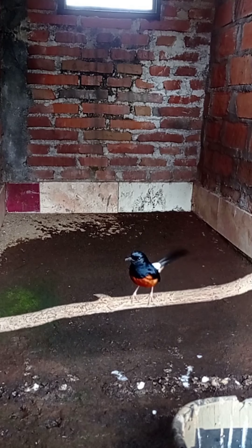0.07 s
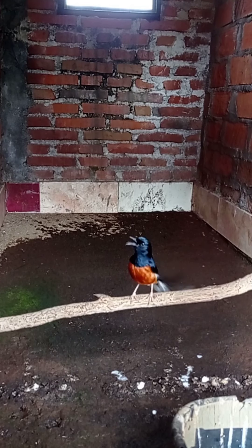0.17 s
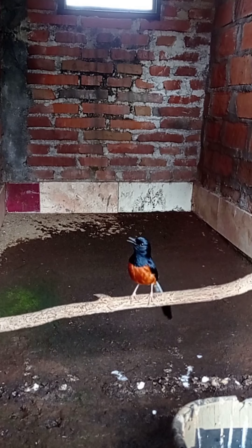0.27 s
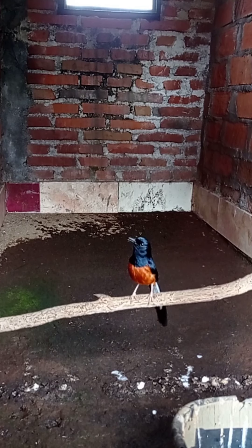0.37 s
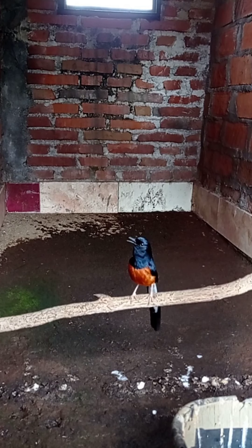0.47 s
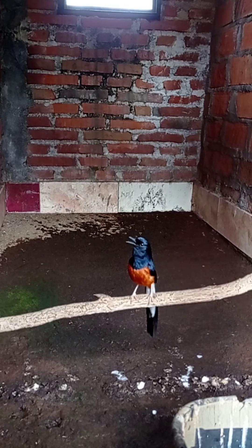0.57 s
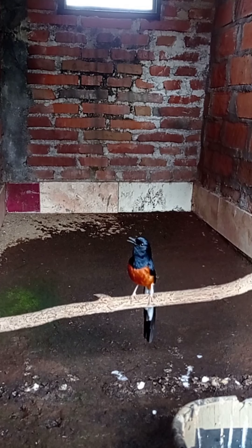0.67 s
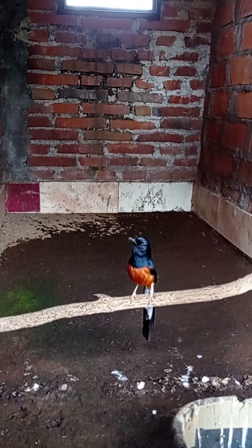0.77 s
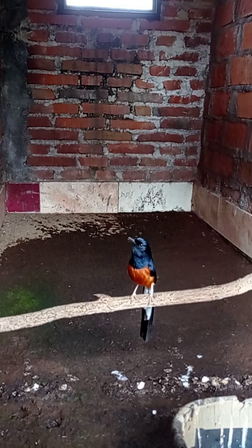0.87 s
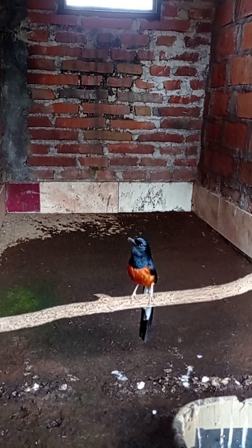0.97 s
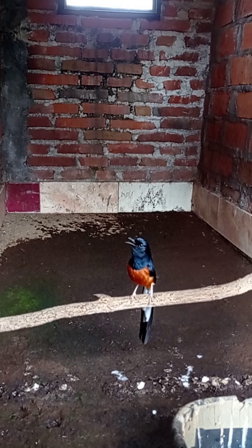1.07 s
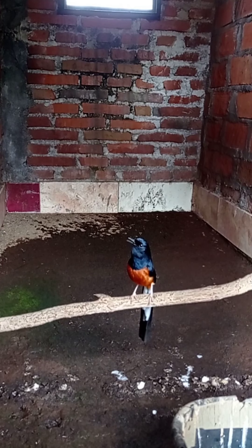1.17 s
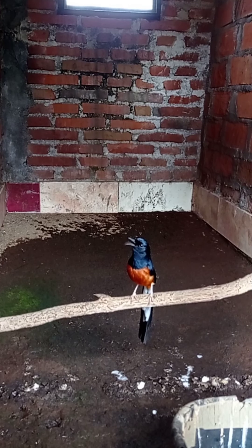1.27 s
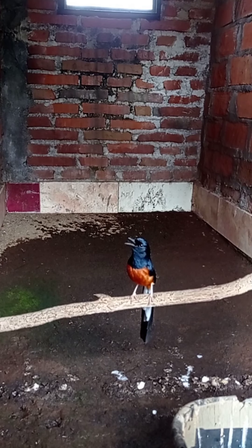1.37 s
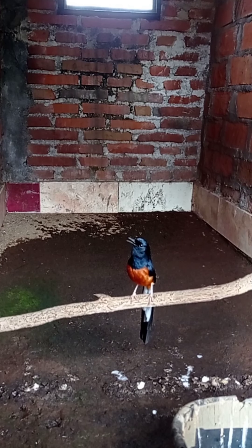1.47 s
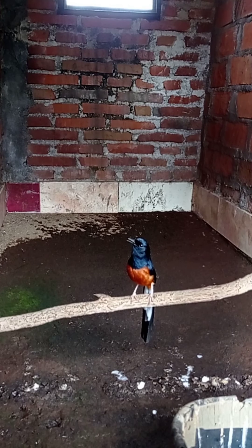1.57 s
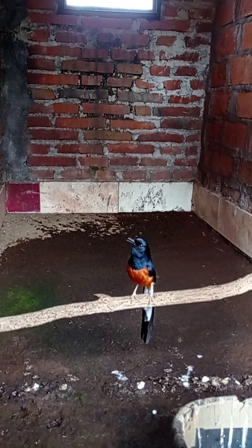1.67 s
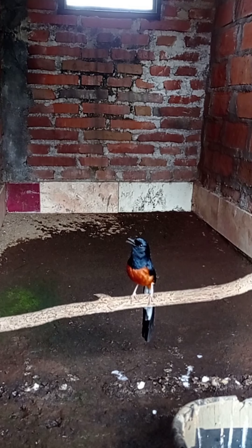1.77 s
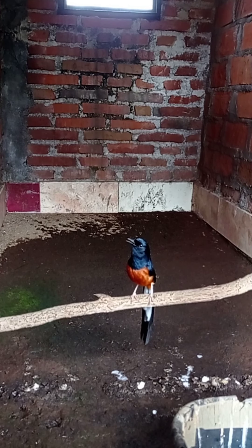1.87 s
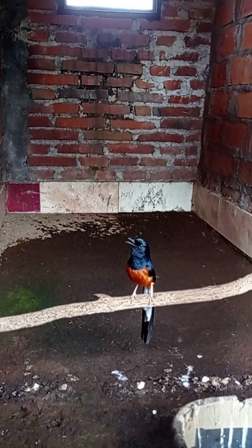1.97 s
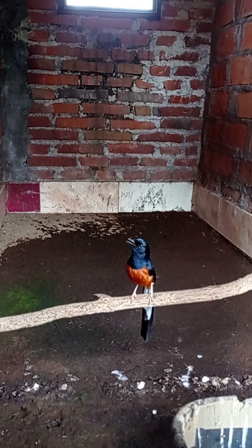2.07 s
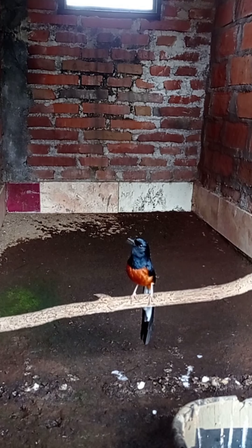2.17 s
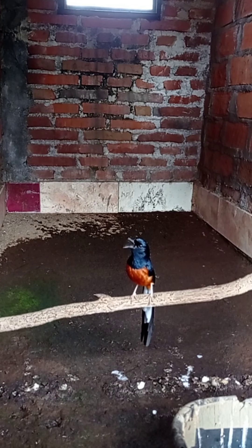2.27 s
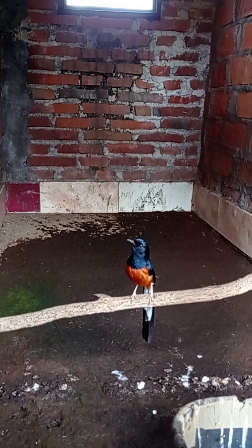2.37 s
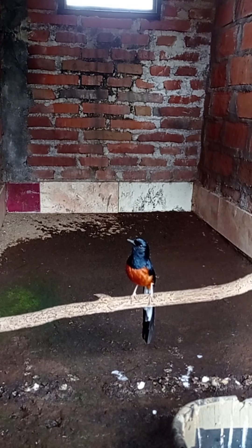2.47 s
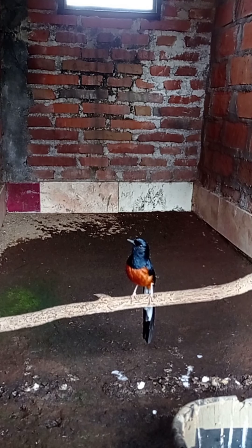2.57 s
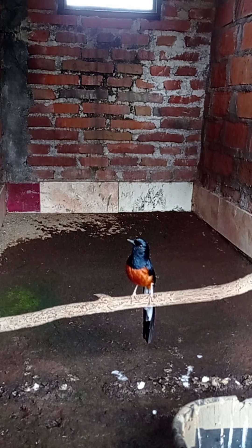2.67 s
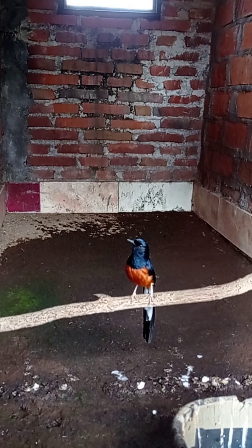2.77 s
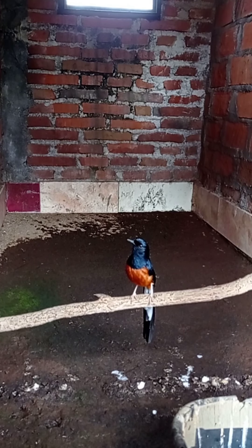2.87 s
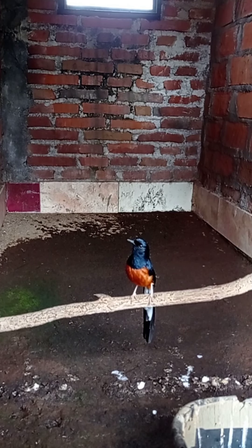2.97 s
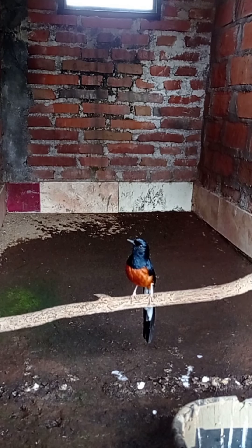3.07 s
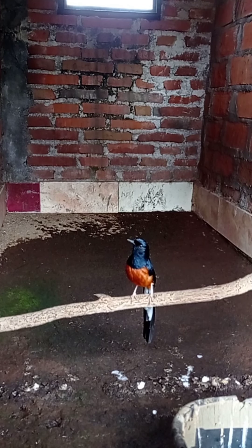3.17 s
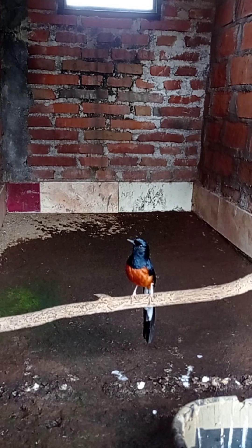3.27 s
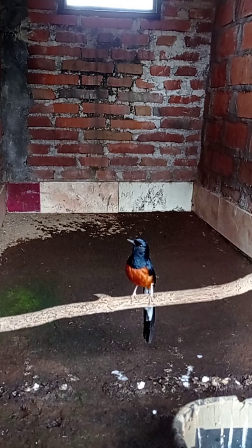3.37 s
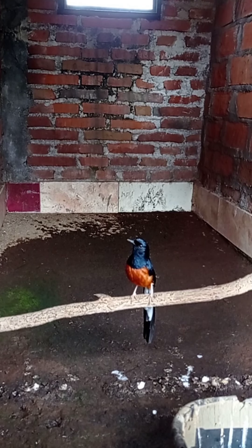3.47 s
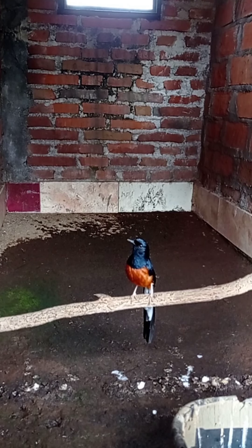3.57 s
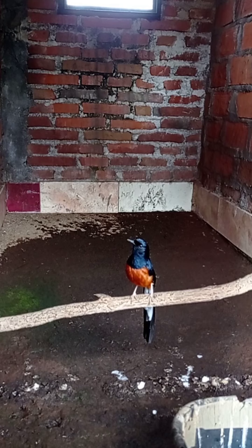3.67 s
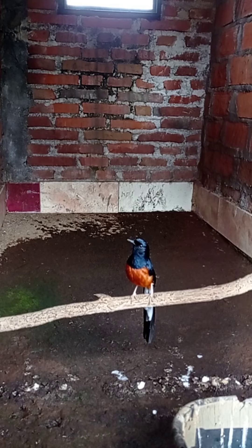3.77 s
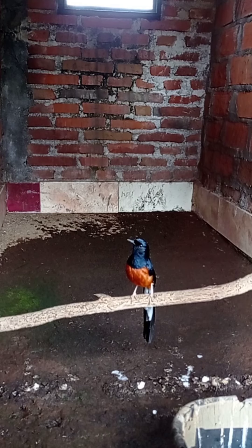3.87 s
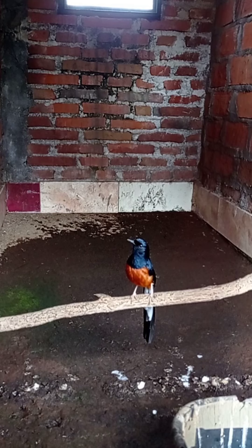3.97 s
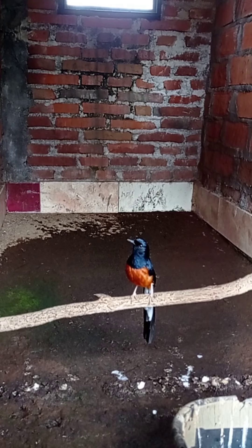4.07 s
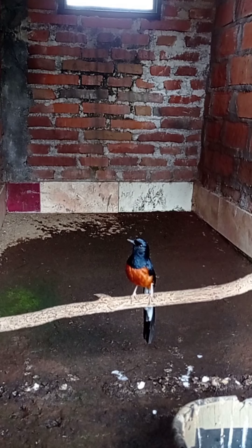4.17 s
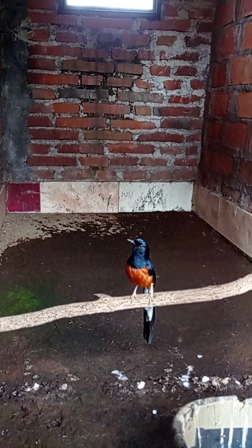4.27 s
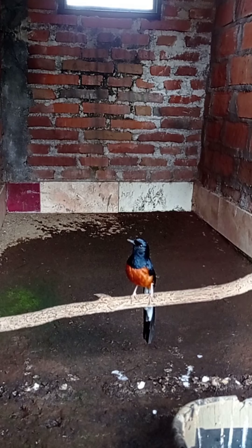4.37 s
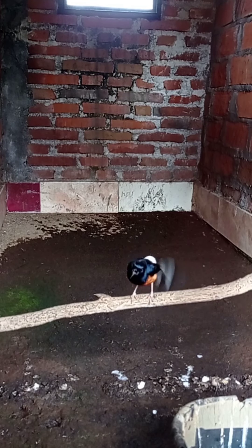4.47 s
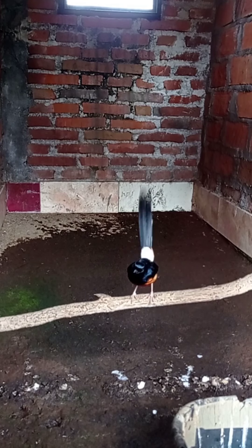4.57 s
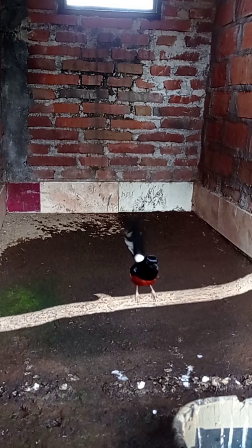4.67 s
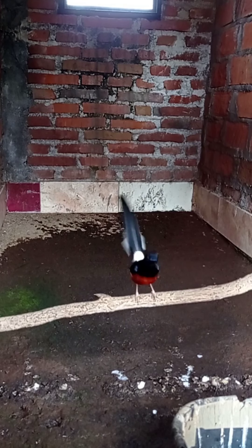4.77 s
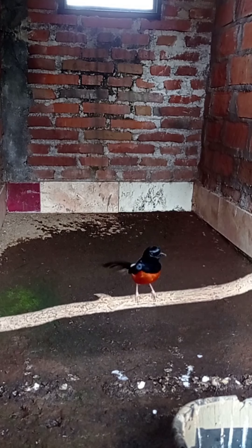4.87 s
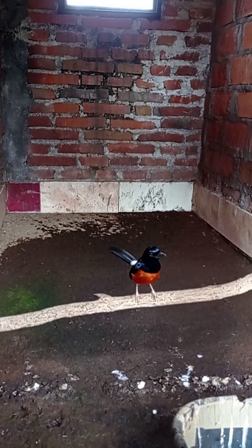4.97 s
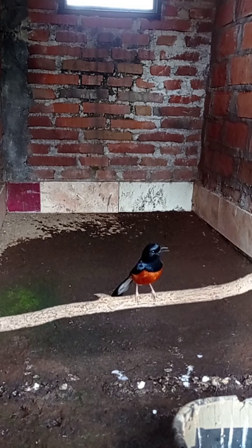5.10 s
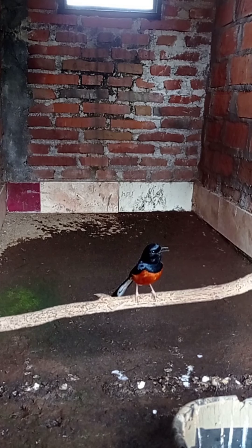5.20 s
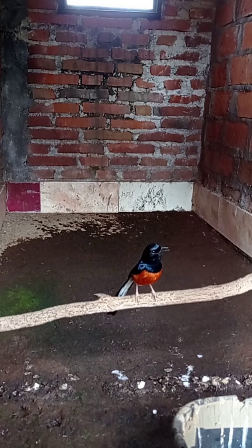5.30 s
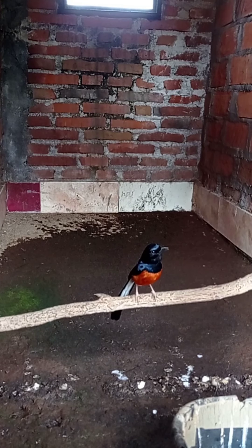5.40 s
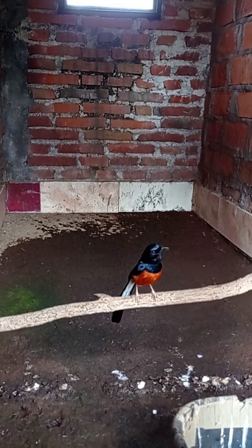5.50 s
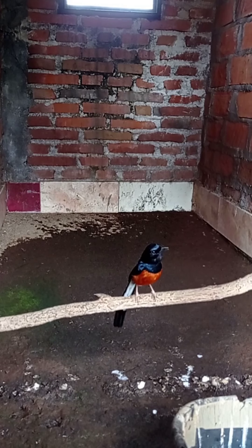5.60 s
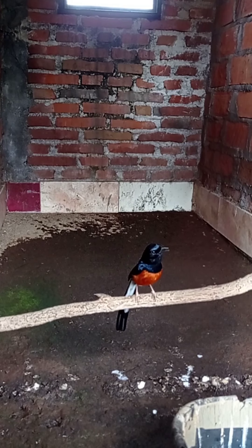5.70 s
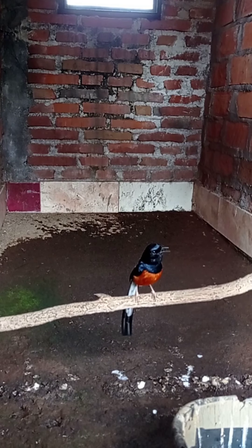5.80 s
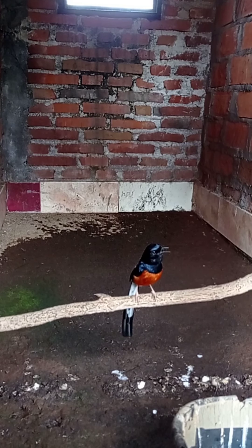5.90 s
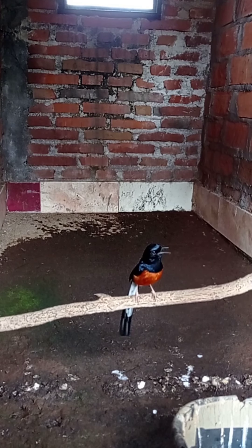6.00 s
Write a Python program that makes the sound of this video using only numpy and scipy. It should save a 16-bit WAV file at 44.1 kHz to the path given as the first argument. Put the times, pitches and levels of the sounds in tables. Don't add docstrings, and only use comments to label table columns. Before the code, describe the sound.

Bright, fluid birdsong rings off close brick walls, pausing for soft murmurs and sharp tail snaps before a long whistle and a pulsed burst.

```python
import sys
import numpy as np
from scipy import signal
from scipy.fft import irfft, next_fast_len
from scipy.io import wavfile
from scipy.ndimage import uniform_filter1d, minimum_filter1d

SR = 44100
rng = np.random.default_rng(int(sys.argv[2]) if len(sys.argv) > 2 else 0)


def master_out(mix):
    frames = np.transpose(np.atleast_2d(mix))
    ceiling = np.clip(frames, -1, 1)
    pcm = np.round(ceiling * 32767).astype(np.int16)
    wavfile.write(sys.argv[1], SR, pcm)


def invert_db(level):
    return 10 ** (np.asarray(level, dtype=float) / 20)


N = 266364

# (start [s], length [s], level [dB])
RUSTLES = [
    (-.05, 0.13, -45),
    (0.097, 0.56, -43.5),
    (2.395, 0.59, -50),
    (2.655, 0.23, -54),
    (4.266, 0.76, -59.5),
    (4.734, 0.64, -59.5),
    (4.928, 0.56, -54),
]
# (frequency [Hz], level [dB])
RUSTLE_COLOUR = [(1350, -32.5), (2300, -9), (2800, -15.5), (3900, -3.5), (5000, -12), (6300, -10.5),
                 (8200, -24), (11500, -38.5)]
# (time [s], level [dB], width [s])
PUFFS = [
    (3.728, -63, 0.046),
    (4.0, -65.5, 0.044),
    (4.209, -64.5, 0.052),
    (4.42, -64.5, 0.03),
    (5.671, -59.5, 0.03),
]
# (frequency [Hz], level [dB])
PUFF_COLOUR = [(150, -15), (300, -2.5), (1100, -16.5), (2000, -19), (8000, -60)]

# (time [s], level [dB])
HUM = [(0, -52), (0.45, -54), (0.58, -63), (0.72, -77.5), (0.9, -61.5), (1.2, -70), (1.5, -81), (1.75, -72),
       (1.95, -77), (2.2, -75), (2.5, -75.5), (2.68, -66), (3.17, -76), (3.8, -66), (4.25, -63.5),
       (5.1, -61), (5.79, -63.5), (6.04, -81)]
# (time [s], level [dB], width [s])
GUSTS = [(.28, -64, 0.42), (2.3, -78.5, 0.29), (2.74, -56.5, 0.035), (3.02, -65, 0.057), (3.33, -69, 0.12),
         (3.78, -59.5, 0.16), (4.45, -62.5, 0.19), (4.92, -54.5, 0.05), (5.15, -64, 0.19),
         (5.57, -61, 0.14), (5.75, -57.5, 0.085)]
# (frequency [Hz], level [dB])
DEEP_COLOUR = [(20, -46), (45, -27.5), (80, 16), (110, -9), (160, -39), (400, -81.5)]
# (frequency [Hz], level [dB])
UPPER_COLOUR = [(80, -41.5), (115, -12), (150, 1.5), (220, -11), (330, -25), (600, -35), (4000, -39.5),
                (11000, -81)]
# (frequency [Hz], level [dB])
AIR_COLOUR = [(180, -29.5), (300, -8), (1000, -17.5), (2500, -13.5), (4500, -13), (8000, -35),
              (12000, -55.5)]
# (time [s], level [dB], frequency [Hz], width [s])
PHONE_KNOCKS = [
    (5.799, -36.5, 140.4, 0.0069),
]

PURE_DB = [2, 2, 4, 3.5, -5.5, -14.5]
HARSH_DB = [-7, -10, -20.5, -28.5, -41, -33.5]
VOICES = {"scoop": (-34.5, -41), "whip": (-35.5, -42), "settle": (-52, -59), "climb": (-44, -49),
          "dart": (-19.5, -38), "hook": (-37.5, -45.5), "shelf": (-31.5, -37), "leap": (-47, -52.5),
          "swell": (-41, -62.5), "hold": (-41, -50.5), "pipe": (-28.5, -46), "reed": (-19, -39.5),
          "pip": (-34.5, -49.5), "chirp": (-32, -59.5), "call": (-40.5, -53), "squeeze": (16.5, 23.4),
          "arch": (-39.5, -50.5), "sweep": (-15.5, -38), "whistle": (-38.5, -54)}
WOBBLES = {"arch": .011, "reed": .008, "settle": .008, "hook": .008, "swell": .003, "hold": .005, "dart":
           .003, "scoop": .005, "whip": .005, "pipe": .0015, "whistle": .0015, "pip": .003, "climb": .006,
           "leap": .006, "chirp": .008, "call": .006}
# (frequency [Hz], level [dB])
PARTIAL_COLOUR = [(2500, -12), (6500, 7.5), (8000, -4.5), (9700, 14.5), (12500, -10), (14800, 2)]
SHAPES = {"whip": (2.5, 0.91, .75, -15, -17), "settle": (1.4, 5.5, 5.5, -24.5, -8.5),
          "climb": (1.71, 2.5, 3, -18, -20), "hook": (1.07, 3, 0, -26, -11.5), "shelf": (12, 0, 4, -24, -2),
          "leap": (0.77, 1.25, 0.9, -8.5, -16.5), "swell": (2, 2.5, 0.5, -29, -36.5),
          "hold": (3.5, 7.5, -0.63, -34.5, -3), "chirp": (0.84, 1.55, .5, -19, -27),
          "call": (1.93, 8.5, .5, -10, -13)}

# (start [s], length [s], from [Hz], to [Hz], peak [dB])
HOOKS = [
    (0, 0.042, 2044, 1274, -27.5),
    (0, 0.0095, 3120, 2080, -18.5),
    (1.548, 0.058, 1967, 1630, -17.5),
]
# (time [s], pitch [Hz], level [dB])
SQUEEZE = [(0.222, 1143, -67), (0.243, 1377, -46), (0.266, 1534, -38), (0.284, 1703, -43),
           (0.296, 1860, -47.5), (0.319, 1723, -63)]
# (time [s], pitch [Hz], level [dB])
SMALL_ARCH = [(0.3, 1750, -45.5), (0.34, 1916, -28.5), (0.38, 2183, -26), (0.407, 2083, -26),
              (0.432, 1891, -34), (0.468, 1620, -50), (0.501, 1483, -53)]
# (time [s], pitch [Hz], level [dB])
BIG_ARCH = [(0.509, 1440, -47), (0.542, 1630, -30), (0.57, 1927, -22.5), (0.601, 2126, -9.5),
            (0.652, 2211, -10.5), (0.679, 2217, -14.5), (0.71, 2073, -10.5), (0.742, 1814, -30.5),
            (0.8, 1788, -37)]
# (start [s], length [s], from [Hz], to [Hz], peak [dB])
SETTLES = [
    (.822, 0.15, 1224, 2110, -27),
]
# (time [s], pitch [Hz], level [dB])
REED = [(.882, 1015, -62.5), (.897, 1187, -42), (.908, 1188, -32.5), (.936, 1242, -31), (.948, 1255, -36.5),
        (.964, 1292, -26.5), (.984, 1260, -29.5), (.998, 1120, -38.5)]
# (time [s], pitch [Hz], level [dB])
SCOOP = [(1.059, 1225, -44), (1.075, 1340, -25), (1.095, 1424, -17), (1.12, 1667, -16), (1.139, 1833, -15),
         (1.153, 2177, -16), (1.164, 2250, -23)]
# (start [s], length [s], from [Hz], to [Hz], peak [dB])
WHIPS = [
    (1.222, 0.092, 1462, 2785, -15.5),
]
# (start [s], peak [dB])
DARTS = [
    (1.372, -14),
    (1.45, -16),
]
# (time after start [s], pitch [Hz], level under peak [dB])
DART = [(0, 5550, -42), (.008, 4950, -28), (.013, 4250, -19), (.017, 3600, -7), (.02, 3150, 0),
        (.0235, 2720, -2), (.027, 2350, -14), (.031, 1950, -36)]
# (start [s], length [s], from [Hz], to [Hz], peak [dB])
SHELVES = [
    (1.53, 0.014, 1690, 2050, -41),
]
# (time [s], pitch [Hz], level [dB])
STEPS = [
    [(1.704, 2480, -54.5), (1.712, 2500, -32.5), (1.72, 2374, -34), (1.725, 1890, -21.5),
     (1.738, 1730, -18.5), (1.76, 1630, -16.5), (1.782, 1396, -37.5)],
    [(1.866, 2960, -42.5), (1.876, 3070, -25.5), (1.882, 2910, -28), (1.886, 2470, -24.5),
     (1.895, 2125, -16), (1.91, 1766, -18), (1.93, 1756, -17.5), (1.955, 1500, -39.5)],
    [(2.014, 3385, -40), (2.024, 3500, -30.5), (2.03, 3250, -25.5), (2.035, 2724, -9.5), (2.045, 2370, -21),
     (2.06, 2166, -15), (2.08, 2013, -23.5), (2.097, 1795, -29)],
]
# (start [s], length [s], from [Hz], to [Hz], peak [dB])
SWELLS = [
    (1.82, 0.05, 2840, 2830, -36),
]
# (start [s], length [s], from [Hz], to [Hz], peak [dB])
HOLDS = [
    (2.15, 0.085, 2383, 2440, -37.5),
    (2.33, 0.15, 1812, 1787, -42.5),
]
# (time [s], pitch [Hz], level [dB])
PLUNGE = [(2.184, 3940, -32.5), (2.19, 5060, -43.5), (2.199, 5110, -21.5), (2.206, 4486, -14.5),
          (2.215, 3260, -19), (2.221, 2664, -23), (2.232, 2082, -31), (2.25, 1450, -34),
          (2.265, 1036, -53.5)]
# (time [s], pitch [Hz], level [dB])
SOAR = [(2.283, 1980, -20), (2.289, 2560, -19), (2.294, 2910, -16.5), (2.299, 3730, -24),
        (2.311, 4100, -33.5), (2.322, 4140, -21), (2.334, 4950, -21), (2.351, 5320, -25.5),
        (2.367, 5390, -45)]
# (time [s], pitch [Hz], level [dB])
COO = [(2.52, 1997, -44), (2.532, 2040, -45), (2.558, 2029, -31.5), (2.62, 2060, -24.5), (2.64, 1996, -36),
       (2.65, 2033, -25.5), (2.67, 2065, -46)]
# (time [s], pitch [Hz], level [dB])
LILT = [(2.725, 2260, -64), (2.739, 2140, -34.5), (2.759, 2110, -30.5), (2.779, 2247, -23),
        (2.809, 2220, -38.5), (2.825, 2147, -40)]
# (time [s], pitch [Hz], level [dB])
PIPE = [(2.884, 2760, -61.5), (2.92, 3090, -39.5), (2.951, 3270, -37), (2.98, 3350, -36.5),
        (3.021, 3378, -32.5), (3.056, 3404, -25), (3.074, 3400, -39)]
# (time [s], pitch [Hz], level [dB])
MURMUR = [(3.179, 1514, -78), (3.22, 1541, -46.5), (3.254, 1500, -46), (3.331, 1530, -40.5),
          (3.348, 1490, -54), (3.365, 1536, -70)]
# (time [s], pitch [Hz], level [dB])
WAVER = [(3.406, 1370, -55.5), (3.419, 1467, -41), (3.439, 1602, -31), (3.462, 1478, -29),
         (3.475, 1590, -27.5), (3.505, 1683, -38), (3.523, 1640, -44.5), (3.535, 1520, -55)]
# (start [s], length [s], from [Hz], to [Hz], peak [dB])
LEAPS = [
    (3.588, 0.12, 1458, 2258, -25),
]
# (start [s], length [s], from [Hz], to [Hz], peak [dB])
CLIMBS = [
    (3.74, 0.083, 1338, 2290, -26.5),
    (3.875, 0.065, 1510, 2406, -27.5),
]
# (time [s], pitch [Hz], level [dB])
VAULT = [(3.996, 1510, -43.5), (4.006, 1720, -36), (4.018, 2304, -29.5), (4.03, 2850, -32),
         (4.05, 3230, -36), (4.072, 3785, -33), (4.081, 3670, -48)]
# (time [s], pitch [Hz], level [dB])
CREST = [(5.146, 2060, -55), (5.191, 2061, -54), (5.231, 2137, -42), (5.266, 2183, -23), (5.291, 2197, -13),
         (5.318, 2106, -23), (5.344, 2029, -6), (5.373, 1980, -38)]
# (time [s], pitch [Hz], level [dB])
LONG_WHISTLE = [(5.476, 1500, -32), (5.519, 1438, -26.5), (5.555, 1420, -20.5), (5.619, 1434, -16),
                (5.673, 1425, -13.5), (5.695, 1449, -15), (5.736, 1512, -20), (5.75, 1664, -32)]
# (time [s], pitch [Hz], level [dB])
BURST = [
    [(5.816, 1794, -55.5), (5.824, 2190, -19.5), (5.833, 2285, -14.5), (5.84, 2026, -10.5),
     (5.861, 2064, -10), (5.868, 2000, -30)],
    [(5.884, 2148, -28), (5.892, 2132, -9), (5.9, 2165, -15.5), (5.922, 2090, -29), (5.93, 2120, -30)],
    [(5.938, 2327, -35), (5.948, 2253, -10.5), (5.962, 2208, -13.5), (5.968, 2150, -11),
     (5.972, 2100, -34.5)],
    [(5.977, 2091, -27.5), (5.989, 2164, -7.5), (6.001, 2231, -17.5), (6.014, 2192, -22), (6.02, 2105, -33)],
    [(6.026, 2180, -34), (6.036, 2205, -19.5), (6.04, 2263, -20.5)],
]

# (time [s], peak [dB], perch knock [dB], length [s], knock frequency [Hz])
SNAPS = [
    (0.0319, -27.5, 4, 0.027, 855),
    (1.176, -43, 3, 0.019, 1170),
    (1.357, -41, -3, 0.013, 1170),
    (1.59, -44, -5, 0.034, 1230),
    (3.967, -62, -20, 0.0045, 1200),
    (4.072, -55.5, -20, 0.008, 1200),
    (4.172, -56, -7, 0.025, 975),
    (4.5498, -25, 7.5, 0.012, 1172),
    (4.7125, -28, 3.5, 0.025, 791),
    (4.919, -30.5, 4.5, 0.02, 721),
]
# (frequency [Hz], level [dB])
SNAP_COLOUR = [(350, -52), (600, -45.5), (900, -18.5), (1900, -23), (2300, -18), (4650, -13), (5200, -14.5),
               (6540, -3.5), (9600, -23), (11000, -36.5), (13300, -36.5), (14900, -23), (16000, -61.5)]

# (start [s], length [s], from [Hz], to [Hz], peak [dB])
CHIRPS = [
    (.138, 0.029, 5230, 4580, -36.5),
    (.22, 0.02, 5150, 4300, -32.5),
    (.382, 0.019, 5250, 4650, -32.5),
    (.458, 0.034, 5240, 4600, -35.5),
    (.535, 0.035, 5360, 4620, -35.5),
    (.618, .03, 5260, 4520, -39.5),
    (5.66, 0.092, 6040, 5330, -47.5),
]
# (start [s], length [s], from [Hz], to
# [Hz], peak [dB])
FAR_CALLS = [(1.86, 0.083, 2722, 2795, -30.5), (3.2, 0.15, 3414, 3786, -56.5),
             (3.48, 0.088, 1936, 2920, -56), (3.65, 0.035, 2670, 2240, -46.5),
             (4.075, 0.015, 5700, 5200, -53), (1.8, 0.046, 4200, 4485, -59), (.09, 0.029, 2630, 2700, -49),
             (2.27, 0.012, 1450, 1460, -38.5), (2.528, 0.011, 2220, 2200, -46),
             (2.64, .03, 2650, 2440, -59.5), (2.78, 0.032, 2726, 2575, -55), (5.27, 0.013, 3130, 2395, -52),
             (5.45, 0.033, 3140, 2430, -59.5), (5.818, 0.011, 3060, 2685, -50.5),
             (5.885, 0.011, 3480, 3240, -61.5), (5.145, 0.1, 4100, 4290, -47),
             (5.34, 0.13, 3535, 3430, -53.5)]
# (time [s], pitch [Hz], level [dB])
FAR_GLIDE = [(5.17, 761, -73.5), (5.242, 950, -46), (5.289, 1100, -48.5), (5.38, 1927, -31),
             (5.409, 2156, -43), (5.431, 1530, -32.5), (5.472, 1159, -46.5), (5.568, 823, -51.5),
             (5.681, 872, -77)]

# (frequency [Hz], level [dB])
DIRECT_COLOUR = [(1800, 0), (3200, 3), (5500, -3), (10000, -5)]
# (delay [s], level [dB], sign [+1 or -1])
ECHOES = [(.00184, -6, -1), (.0047, -13, -1), (.0066, -11, 1), (.0094, -12, -1), (.0145, -11, 1)]
# (frequency [Hz], time to fall 60 dB [s])
WALLS = [(600, 0.23), (1600, 0.22), (3000, 0.21), (6000, 0.13), (12000, 0.1)]
# (frequency [Hz], level [dB])
GATE = [(100, -104), (1000, -92.5), (5000, -92.5), (14000, -92.5)]


def evened(x):
    return x / np.sqrt(np.mean(x ** 2) + 1e-20)


def read(points, hz):
    f, value = np.transpose(points)
    return np.interp(np.log(hz + 1), np.log(f + 1), value)


def add(mix, s, sound):
    part = mix[max(round(s * SR), 0):][:len(sound)]
    part += sound[:len(part)]


def coloured(x, colour):
    gain = invert_db(read(colour, np.fft.rfftfreq(512, 1 / SR)))
    return signal.oaconvolve(x, np.fft.fftshift(irfft(gain)) * np.hanning(512), "same")


def noise(colour, patchy_db, size=512):
    frames, hz = 4 * N // size + 5, np.fft.rfftfreq(size, 1 / SR)
    real, imaginary, patches = rng.standard_normal((frames, len(hz), 3)).T
    patches = uniform_filter1d(patches, size=6, axis=0)
    patches = evened(uniform_filter1d(patches, size=12, axis=1))
    z = (real + 1j * imaginary) * invert_db(read(colour, hz)[:, None] + patchy_db * patches)
    return evened(signal.istft(z, nperseg=size, noverlap=3 * size // 4)[1][:N])


def drift(count, size):
    white = rng.standard_normal(N // 10)[:count]
    return evened(uniform_filter1d(uniform_filter1d(white, size=size), size=size))


def level(rows):
    s, db = np.transpose(rows)
    return invert_db(np.interp(np.arange(N) / SR, s, db, left=-150, right=-150))


def swells(rows):
    t = np.arange(N) / SR
    return sum(invert_db(db) * np.exp(-((t - s) / width) ** 2) for s, db, width in rows)


def rustle():
    t, effort = np.arange(N) / SR, np.zeros(N)
    for s, length, db in RUSTLES:
        rise = (t - s) / (0.14 * length)
        fall = (s + length - t) / (0.89 * length)
        effort += invert_db(db) * np.clip(np.minimum(rise, fall), 0, 1) ** 2
    brushing = effort * noise(RUSTLE_COLOUR, 5.5, size=1024)
    return brushing + swells(PUFFS) * noise(PUFF_COLOUR, 2.5)


def hum():
    deep_gain = invert_db(-14.5) * level(HUM) + swells(GUSTS)
    low = deep_gain * noise(DEEP_COLOUR, 1.5, size=2048)
    low += level(HUM) * noise(UPPER_COLOUR, 3.2, size=2048)
    for s, db, hz, width in PHONE_KNOCKS:
        t = np.arange(-2000, 2000) / SR
        add(low, s + t[0], invert_db(db) * np.cos(2 * np.pi * hz * t) * np.exp(-(t / width) ** 2))
    return low + invert_db(-75) * noise(AIR_COLOUR, 3.5, size=1024)


def shaped(row, kind):
    start, length, from_hz, to_hz, peak_db = row
    lazy, ease, peak, start_db, end_db = SHAPES[kind]
    u, peak = np.linspace(0, 1, num=24), np.clip(peak, .1, .9)
    hz = from_hz * (to_hz / from_hz) ** (1 - (1 - u ** lazy) ** ease)
    before = np.maximum(1 - u / peak, 0)
    after = np.maximum((u - peak) / (1 - peak), 0)
    db = peak_db + start_db * before ** 2.5 + end_db * after ** 0.84
    return np.transpose([start + length * u, hz, db])


def whistle(rows, second_db, upper_db, wobble, fade_s):
    s, *columns = np.transpose(rows)
    t = np.arange(s[0], s[-1] + fade_s, 1 / SR)
    hz, db = (uniform_filter1d(np.interp(t, s, c), size=70, mode="nearest") for c in columns)
    hz = hz * (1 + 1.5 * wobble * drift(count=len(t), size=130))
    db = db + 220 * wobble * np.minimum(drift(count=len(t), size=260), 1)
    phase = 2 * np.pi * np.cumsum(hz) / SR
    harsh = second_db > 0
    softer_db = np.maximum(db - db.max(), -25) * (1 - harsh)
    flicker_db = 300 * wobble + 4.5
    octave_db = second_db - .3 * softer_db
    octave_db = octave_db + flicker_db * np.minimum(drift(count=len(t), size=140), 1)
    tone = np.sin(phase) + invert_db(octave_db) * np.sin(2 * phase)
    for k, step_db in enumerate(HARSH_DB if harsh else PURE_DB, start=3):
        partial_db = upper_db + step_db + (1 - harsh) * read(PARTIAL_COLOUR, k * hz) + 0.024 * softer_db
        partial_db += flicker_db * np.minimum(drift(count=len(t), size=120), 1)
        tone += (k * hz < 15500) * invert_db(partial_db) * np.sin(k * phase)
    fade = np.clip(np.minimum(t - t[0], t[-1] - t) / fade_s, 0, 1)
    return s[0], np.sqrt(2) * invert_db(db) * tone * np.sin(np.pi / 2 * fade) ** 2


def birds(ruled, free, fade_s):
    out = np.zeros(N)
    notes = [(kind, shaped(row, kind)) for kind, rows in ruled.items() for row in rows]
    for kind, points in notes + free:
        add(out, *whistle(points, *VOICES[kind], WOBBLES.get(kind, .004), fade_s))
    return out


def near_song():
    ruled = {"hook": HOOKS, "settle": SETTLES, "whip": WHIPS, "shelf": SHELVES, "swell": SWELLS,
             "hold": HOLDS, "leap": LEAPS, "climb": CLIMBS}
    free = [("squeeze", SQUEEZE), ("arch", SMALL_ARCH), ("arch", BIG_ARCH), ("reed", REED), ("scoop", SCOOP),
            ("sweep", PLUNGE), ("sweep", SOAR), ("swell", COO), ("swell", LILT), ("pipe", PIPE),
            ("hold", MURMUR), ("hold", WAVER), ("hook", VAULT), ("whistle", CREST), ("whistle", LONG_WHISTLE)]
    free += [("dart", np.add(DART, [s, 0, db])) for s, db in DARTS]
    free += [("hook", step) for step in STEPS]
    free += [("pip", pulse) for pulse in BURST]
    return birds(ruled, free, fade_s=0.004)


def snaps():
    drive, knock, t = np.zeros(N), np.zeros(N), np.arange(3000) / SR
    for s, db, knock_db, length, knock_hz in SNAPS:
        white, size = rng.standard_normal((3000, 2)).T
        shape = np.minimum(t / .003, 1) * np.exp(-(t / length) ** 2)
        clicks_db = 4.6 * uniform_filter1d(size, size=20) * np.sqrt(20)
        add(drive, s, invert_db(db + 21.5) * white * invert_db(clicks_db) * shape)
        ring = np.sin(2 * np.pi * knock_hz * t) * shape * (1 + 0.5 * drift(count=3000, size=110))
        add(knock, s, invert_db(db + knock_db - 14.5) * ring)
    return coloured(drive, SNAP_COLOUR) + knock


def far_birds():
    return birds({"chirp": CHIRPS, "call": FAR_CALLS}, [("call", FAR_GLIDE)], fade_s=0.0036)


def echoes(x):
    out = x.copy()
    for delay, db, sign in ECHOES:
        add(out, delay, sign * invert_db(db) * x)
    return out


def aviary(x, first_s):
    taps = np.zeros(SR // 2)
    at = np.arange(0, SR // 2 - 20, 20) + rng.integers(0, 20, (SR // 2 - 1) // 20)
    taps[at] = rng.choice([-1., 1.], len(at))
    hz, t, z = signal.stft(taps, SR, nperseg=256)
    tail = signal.istft(z * invert_db(-60 * t / read(WALLS, hz)[:, None]), SR, nperseg=256)[1]
    tail *= np.clip(np.arange(len(tail)) / SR / first_s - 1, 0, 1)
    return signal.fftconvolve(x, tail / np.linalg.norm(tail))[:N]


def scene():
    near = near_song() + snaps()
    far = far_birds()
    near_in_room = echoes(coloured(near, DIRECT_COLOUR)) + invert_db(-6.5) * aviary(near, first_s=0.0054)
    far_in_room = far + invert_db(-1.5) * aviary(far, first_s=0.006)
    return (invert_db(-1.0) * near_in_room + invert_db(-0.5) * far_in_room + rustle() + hum())[None]


def roll_off(x):
    return signal.sosfilt(signal.butter(12, 16760, fs=SR, output="sos"), x)


def record(dry):
    hz, t, z = signal.stft(dry, SR, nperseg=512, noverlap=384)
    power = uniform_filter1d(uniform_filter1d(abs(z) ** 2, size=5, axis=1), size=3, axis=2)
    under_db = np.clip(10 * np.log10(power + 1e-20) - read(GATE, hz)[:, None], -20, 0)
    gated = signal.istft(z * invert_db(1.4 * under_db), SR, nperseg=512, noverlap=384)[1][:, :N]
    ceiling = 0.72
    over = np.maximum(abs(signal.hilbert(gated, next_fast_len(N))[:, :N]) / ceiling, 1)
    limited = gated * uniform_filter1d(minimum_filter1d(1 / over, size=89), size=89)
    edge = signal.firwin(511, 15900, window=("kaiser", 9), fs=SR)
    return roll_off(signal.oaconvolve(limited, edge[None], "same"))


dry = scene()
out = record(dry)
master_out(out)
```